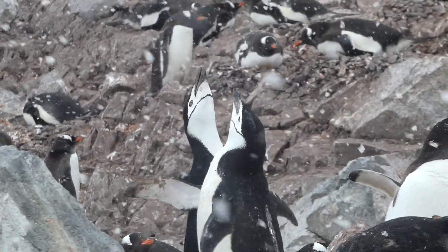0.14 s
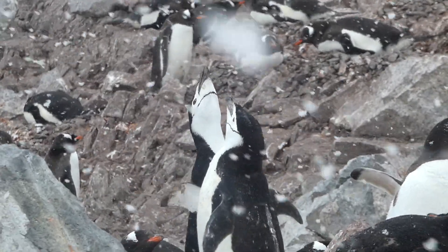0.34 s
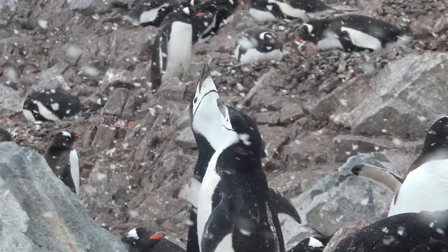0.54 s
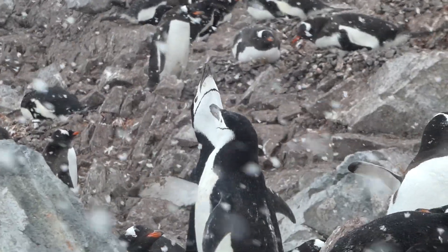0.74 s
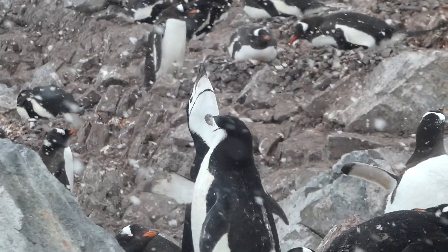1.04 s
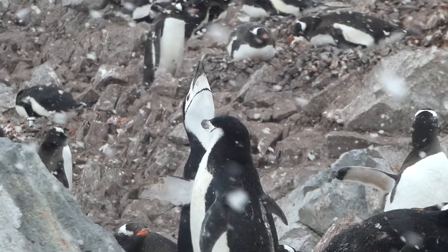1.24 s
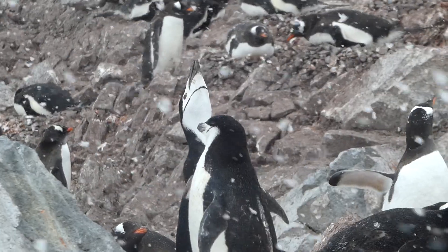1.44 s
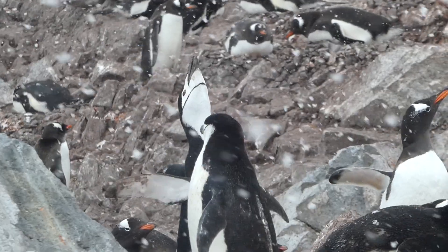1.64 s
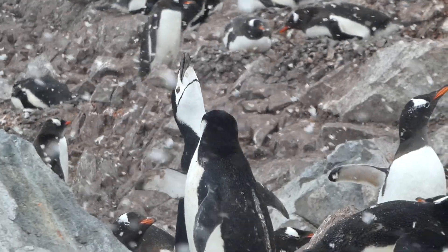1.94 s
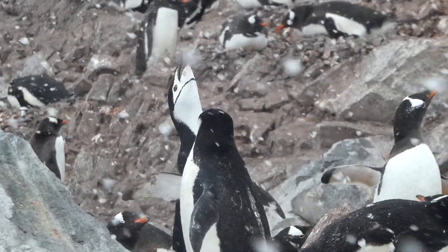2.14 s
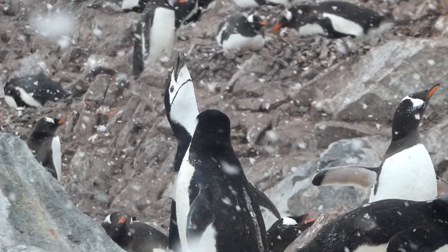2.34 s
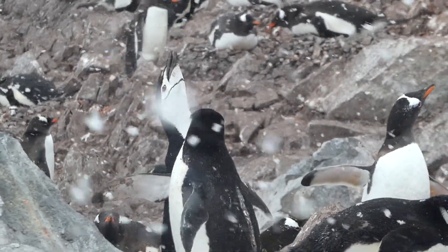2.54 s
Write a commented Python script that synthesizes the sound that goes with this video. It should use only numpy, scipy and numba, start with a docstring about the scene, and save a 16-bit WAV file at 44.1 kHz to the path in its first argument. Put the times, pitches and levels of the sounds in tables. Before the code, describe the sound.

Close raspy penguin braying, heaving and cracking into squeaks, with distant birds calling on rocky ground

```python
"""Penguin braying on a rocky slope

Close by, eight rasping swells rise and fall in pitch, some cracking into a squeak: harmonics and uneven
pulses excite moving throat resonances. A neighbour's clear note and the farther calls are harmonic tones.
Clicks, perhaps the bird's creak, are short gritty noise bursts; the colony and the wind puffs on the
microphone are banded noise. The rocks add decaying reflections, different at each ear.
"""
import sys
import numpy as np
from scipy import signal
from scipy.fft import rfft, irfft, next_fast_len
from scipy.io import wavfile
from scipy.ndimage import uniform_filter1d
from numba import njit

SR = 44100
rng = np.random.default_rng(int(sys.argv[2]) if len(sys.argv) > 2 else 0)


def int16_out(signal):
    """Quantize to a 16-bit WAV file."""
    q = np.round(np.clip(np.atleast_2d(signal).T, -1, 1) * 32767)
    wavfile.write(sys.argv[1], SR, q.astype(np.int16))


N = 119070
T = np.arange(N) / SR

# pulse rate of the bray: t/s, f/Hz
PITCH = [(.205, 300), (.24, 442.2), (.28, 526), (.32, 458.7), (.345, 427.3), (.38, 365.3), (.42, 353),
         (.49, 561.4), (.57, 495.8), (.6, 447.8), (.63, 403.5), (.655, 404.8), (.68, 445.2), (.71, 472.2),
         (.73, 506), (.745, 603), (.772, 488.8), (.805, 474), (.86, 400.4), (.9, 403.2), (.955, 495.9),
         (.975, 597), (1.01, 513.3), (1.035, 505), (1.06, 466.3), (1.12, 405), (1.15, 367.2),
         (1.185, 251.8), (1.457, 329.2), (1.48, 471.6), (1.515, 535), (1.538, 615.5), (1.553, 495),
         (1.61, 421.7), (1.68, 339.9), (1.715, 440.8), (1.755, 512.3), (1.815, 488), (1.85, 445.3),
         (1.93, 281.8), (1.985, 319.2), (2.01, 411.5), (2.072, 547.3), (2.095, 466.7), (2.12, 436),
         (2.22, 298), (2.28, 465), (2.34, 517.3), (2.375, 467.4), (2.4, 453), (2.43, 398), (2.48, 289.8)]
# hoarseness: t/s, roughness (0 to 1)
HOARSE = [(.26, .65), (.33, .2), (.6, .45), (.7, .15), (.82, .35), (.92, .15), (1.01, .3), (1.12, .2),
          (1.48, .7), (1.55, .2), (1.73, .6), (1.82, .25), (2.1, .5), (2.3, .6), (2.39, .25)]
# spectral envelope of the throat: f/Hz, level/dB
THROAT = [(260, -46), (450, -22), (554, 3.5), (745, -3.5), (930, 5.5), (1130, 2), (1200, 2.5), (1520, -3.5),
          (1860, 4), (2130, -2.5), (2400, -1.5), (2620, -9.5), (3740, -12.5), (5400, -12.5), (7960, -28),
          (10100, -23.5), (15500, -48)]
# the bird voices: start t/s, end t/s
PHRASES = [(0.207, 1.186), (1.46, 1.965), (1.986, 2.48)]
PHRASE_ATTACK_S, PHRASE_RELEASE_S = 0.0067, 0.007
REFERENCE_EFFORT_DB = -21.5
BREAK_BELOW_DB, ROUGHER_PER_DB = -21, .1
THROAT_HZ, THROAT_HZ_PER_DB, RISING_DROP_HZ = 1800, 11, 212
THROAT_FOLLOWS_PITCH = 0.73  # exponent
THROAT_WIDTH_HZ, THROAT_BYPASS = 180, 0.64
# a second resonance sits just above the first
SECOND_RATIO, SECOND_WIDTH_HZ, SECOND_DB = 1.207, 840, 0.5
BASS_DB, MIDDLE_DB, TREBLE_DB = -14.5, -1.5, -8.5  # at the reference effort
BASS_FOLLOWS, TREBLE_FOLLOWS = 0.57, 0.98  # share of the effort's swing in dB
RISING_BASS_DB, RISING_TREBLE_DB = 3.5, 1  # a rising swell is fuller
CRACK_LOSS = .7  # share of the amplitude lost during a squeak


def bray():
    """Source-filter principle: effort makes the voice louder and clearer and lifts the throat resonances."""
    level_db, (hz,), (hoarse,) = effort_db(), in_time(PITCH), in_time(HOARSE)
    effort = level_db - REFERENCE_EFFORT_DB
    falling = uniform_filter1d((np.gradient(hz) < 0) * 1., size=600)
    rising = 1 - falling
    rough = np.clip(hoarse + ROUGHER_PER_DB * np.maximum(BREAK_BELOW_DB - level_db, 0), 0, 1)
    source = coloured(syrinx(hz, rough, falling), THROAT)

    throat_hz = THROAT_HZ + THROAT_HZ_PER_DB * effort - RISING_DROP_HZ * rising
    throat_hz = throat_hz * (hz / 470) ** THROAT_FOLLOWS_PITCH
    first = resonance(source, throat_hz, THROAT_WIDTH_HZ)
    second = resonance(source, SECOND_RATIO * throat_hz, SECOND_WIDTH_HZ)
    throat = THROAT_BYPASS * source + first + from_db(SECOND_DB + .5 * effort) * second

    # each band is held at unit power, so its gain alone sets its level
    bass = evened(band(band(source, 1257, "low", order=6), 430, "high"))
    middle = evened(band(throat, [1150, 3200], "band", order=4))
    treble = evened(band(smeared(source), 2650, "high", order=6))
    bass = bass * from_db(BASS_DB + BASS_FOLLOWS * effort + RISING_BASS_DB * rising)
    middle = middle * from_db(MIDDLE_DB + effort)
    treble = treble * from_db(TREBLE_DB + TREBLE_FOLLOWS * effort + RISING_TREBLE_DB * (.5 + rising))

    sounding = 0
    for start, end in PHRASES:
        attack = np.clip((T - start) / PHRASE_ATTACK_S + .5, 0, 1)
        sounding = sounding + attack * np.exp(-np.maximum(T - end, 0) / PHRASE_RELEASE_S)
    cracked = np.clip(sum(gate(s, length, .006) for s, length, *_ in SQUEAKS), 0, 1)
    return sounding * (1 - CRACK_LOSS * cracked) * from_db(REFERENCE_EFFORT_DB) * (bass + middle + treble)


# rising swells: peak t/s, level/dB, rise/(dB/s)
RISES = [(0.272, -24.5, 290), (0.466, -32.5, 140), (.703, -18.5, 266), (.942, -18.5, 166),
         (1.503, -23.5, 296), (1.532, -30.5, 300), (1.735, -26, 427), (2.036, -20.5, 447),
         (2.302, -25, 350)]
# falling cries: start t/s, hold/s, level/dB, fade/(dB/s)
CRIES = [(0.297, 0.033, -22.5, 142), (0.541, 0.026, -18.5, 113), (0.76, 0.045, -17.5, 123),
         (0.997, 0.086, -18, 140), (1.552, 0.017, -17.5, 194), (1.808, 0.034, -17, 300),
         (2.096, 0.024, -21.5, 168), (2.374, 0.027, -20, 274)]
RISE_HOLD_S, RISE_END_DB_PER_S, CRY_ATTACK_DB_PER_S = 0.0092, 552, 1335


def effort_db():
    """Power summation of envelopes linear in dB: a swell builds and breaks off, a cry starts hard and fades."""
    levels = []
    for s, db, rate in RISES:
        before = np.maximum(s - RISE_HOLD_S - T, 0)
        after = np.maximum(T - s - RISE_HOLD_S, 0)
        levels.append(db - rate * before - RISE_END_DB_PER_S * after)
    for s, hold, db, rate in CRIES:
        before = np.maximum(s - T, 0)
        after = np.maximum(T - s - hold, 0)
        levels.append(db - CRY_ATTACK_DB_PER_S * before - rate * after)
    return 10 * np.log10(np.sum(from_db(np.maximum(levels, -70)) ** 2, axis=0))


JITTER_S, SHIMMER_DB = .00016, 4.5  # spread of pulse time and size
LIMP_S, LIMP_SHARE = .00008, .55  # every other pulse of a falling cry is later and weaker
RASP, RASP_FLOOR, WAVER = .9, .1, .004


def syrinx(hz, rough, falling):
    """Pulsed excitation: a clear tone breaks, as it grows hoarse, into limping pulses with rasp in each cycle."""
    cycles = np.cumsum(hz * (1 + WAVER * drift(60))) / SR
    at = np.flatnonzero(np.diff(np.floor(cycles)))
    late, strong = rng.standard_normal((N // 20, 2))[:len(at)].T
    limp = (np.arange(len(at)) % 2) * falling[at]
    to_cycle_end = (1 - cycles[at] % 1) * SR / hz[at]
    where = np.clip(at + SR * (JITTER_S * late + LIMP_S * limp) + to_cycle_end, 0, N - 2)
    size = from_db(SHIMMER_DB * strong) * (1 - LIMP_SHARE * limp)
    # share each pulse between the two nearest samples
    i, part = where.astype(int), where % 1
    pulses = np.bincount(i, size * (1 - part), N) + np.bincount(i + 1, size * part, N)
    rasp = band(rng.standard_normal(N), 1070, "high", order=1) * np.exp(-2.2 * (cycles % 1))
    clear = np.sqrt(1 - rough ** 2) * clear_voice(cycles, hz, falling)
    return clear + rough * evened(pulses) + (RASP_FLOOR + RASP * rough) * rms_one(rasp)


# balance of the harmonics, first upwards, as the pitch rises: level/dB
RISING_HARMONICS_DB = [6.5, 1.5, 8.5, 6.5, 3.5, 2.5, 1, -4.5, -14, -1.5, 0, -6.5, 0.5]
# the same as the pitch falls: level/dB
FALLING_HARMONICS_DB = [-7.5, 0, -2.5, 3, -1, -0.5, 1.5, -2.5, -5, -5.5, -2, -1.5, 3.5]
WANDER_DB, WANDER_RAD, WANDER_PER_S = 4, .8, 26  # spreads reached from the tenth harmonic up
CLEAR_TOP_HZ = 6000


def clear_voice(cycles, hz, falling, count=34):
    """Fourier synthesis: the harmonic balance follows the glide's direction and wanders, most in the treble."""
    out = 0
    for k in range(count):
        rise_db = RISING_HARMONICS_DB[k] if k < len(RISING_HARMONICS_DB) else 0
        fall_db = FALLING_HARMONICS_DB[k] if k < len(FALLING_HARMONICS_DB) else 0
        loose = min((k + 1) / 10, 1)
        db = rise_db + (fall_db - rise_db) * falling + loose * WANDER_DB * drift(WANDER_PER_S)
        phase = 2 * np.pi * (k + 1) * cycles + loose * WANDER_RAD * drift(WANDER_PER_S)
        out = out + from_db(db) * np.cos(phase)
    # harmonics spaced more widely are each stronger
    return band(out * np.sqrt(2 * hz / SR), CLEAR_TOP_HZ, "low")


SMEAR_SAMPLES, SMEAR = (11, 23), .45


def smeared(x):
    """Phase dispersion: short all-pass delays blur each pulse on its way through the windpipe."""
    for lag in SMEAR_SAMPLES:
        b = np.r_[-SMEAR, np.zeros(lag - 1), 1]
        x = signal.lfilter(b, b[::-1], x)
    return x


def resonance(x, centre_hz, width_hz):
    """Resonance: the bandwidth sets the decay, the centre may glide."""
    return moving_resonance(x, 2 * np.pi * centre_hz / SR, np.exp(-np.pi * width_hz / SR))


@njit
def moving_resonance(x, w, r):
    """Two-pole resonance of pole radius r, at an angle w that moves."""
    y = np.zeros(len(x))
    for i in range(2, len(x)):
        drive = (1 - r * r) / 2 * (x[i] - x[i - 2])
        y[i] = drive + 2 * r * np.cos(w[i]) * y[i - 1] - r * r * y[i - 2]
    return y


# the voice cracks: t/s, length/s, start f/Hz, end f/Hz, level/dB before the overtones' own
SQUEAKS = [(0.492, 0.011, 1560, 1562, -37), (0.526, 0.014, 1430, 1333, -23),
           (.747, 0.022, 1570, 1370, -27.5), (0.981, 0.022, 1590, 1402, -25),
           (1.79, 0.0052, 1440, 1367, -21), (2.359, 0.0095, 1420, 1312, -29)]
# harmonics of a squeak, first upwards: level/dB
SQUEAK_OVERTONES_DB = [0, -13, -22, -23, -36]


def squeaks():
    """Frequency modulation: short whistles glide unsteadily near the turn of a swell."""
    points, level = [], 0
    for s, length, start_hz, end_hz, db in SQUEAKS:
        points += [(s, start_hz), (s + length, end_hz)]
        level = level + from_db(db) * gate(s, length, 0.0019)
    hz, = in_time(points)
    return level * tone(hz * (1 + 0.0173 * drift(316)), SQUEAK_OVERTONES_DB)


# the neighbour's clear note: t/s, f/Hz, level/dB before the overtones' own
NOTE = [(0, 583, -53), (.045, 593, -49.5), (.095, 586.5, -49), (.115, 559, -58), (.15, 506, -87)]
# its harmonics, first upwards: level/dB
NOTE_OVERTONES_DB = [2.5, 9, -5.5, 0, -7.5, -2.5, -15, -10.5, -15, -17]


def neighbour():
    """Harmonic series on a gliding fundamental: a clear, slightly arched note."""
    hz, db = in_time(NOTE)
    return from_db(db) * tone(hz * (1 + 0.0073 * drift(140)), NOTE_OVERTONES_DB)


# clicks: t/s, level/dB before the halving below
CLICKS = [(1.221, -36.5), (1.255, -35), (1.283, -36.5), (1.347, -36), (1.392, -35)]
CLICK_DECAY_S = 0.0093


def clicks():
    """Exponential decay: sudden bursts of band-limited noise die away as short gritty clicks."""
    level = sum(from_db(db) * (T > s) * np.exp(-np.abs(T - s) / CLICK_DECAY_S) for s, db in CLICKS)
    grit = band(band(rng.standard_normal(N), [600, 4500], "band", order=1), 2920, "low")
    return .5 * level * rms_one(grit)


# calls farther off: t/s, length/s, start f/Hz, end f/Hz, level/dB before the overtones' own
FAR_CALLS = [(1.253, 0.11, 294.2, 312, -50.5), (1.445, 0.083, 309.9, 309, -52),
             (1.632, 0.042, 327, 314, -43), (2.075, 0.228, 292.1, 280.4, -50.5),
             (2.398, 0.11, 299, 306, -48)]
# harmonics of the distant voices, first upwards: level/dB
FAR_OVERTONES_DB = [-5, 2, -8, -7, -17, -5.5, -14]
FAR_WAVER = .04


def far_calls():
    """Amplitude and frequency modulation: the calls of other birds throb and waver."""
    out = 0
    for s, length, start_hz, end_hz, db in FAR_CALLS:
        level = from_db(db + 5.0 * drift(44)) * gate(s, length, 0.017)
        hz = np.interp(T, [s, s + length], [start_hz, end_hz]) * (1 + FAR_WAVER * drift(50.0))
        out = out + level * tone(hz, FAR_OVERTONES_DB)
    return out


CHORUS_DB = -64  # each voice, before the overtones' own levels


def chorus():
    """Superposition: three distant voices overlap, waver and throb independently."""
    out = 0
    for hz in (254, 292.5, 320):
        level = from_db(CHORUS_DB + 4 * drift(25))
        out = out + level * tone(hz * (1 + .07 * drift(4)), FAR_OVERTONES_DB)
    return out


# wind puffs: centre t/s, level/dB
PUFFS = [(0.293, -36), (1.599, -45), (1.828, -42), (1.954, -40.5)]
# spectrum of a puff: f/Hz, relative level/dB
PUFF_COLOUR = [(30, -11), (80, 0.5), (140, 6.5), (220, -7), (500, -45)]
PUFF_WIDTH_S = .026


def wind():
    """Turbulent pressure as low-frequency noise: soft Gaussian puffs on the microphone."""
    level = sum(from_db(db) * np.exp(-((T - s) / PUFF_WIDTH_S) ** 2) for s, db in PUFFS)
    return level * banded_noise(PUFF_COLOUR, patchy_db=4.5)


# spectrum of the colony: f/Hz, relative level/dB
COLONY = [(30, -19), (70, -11), (150, -4), (281, -5.5), (420, -5.5), (597, -11), (815, -13), (1000, -7),
          (1270, -21.5), (1730, -14), (3230, -21.5), (7060, -30), (15000, -38.5)]
COLONY_DB, COLONY_PATCHY_DB = -48.5, 1.8


def colony():
    """Diffuse field: steady coloured noise all round, flickering band by band."""
    return from_db(COLONY_DB) * banded_noise(COLONY, COLONY_PATCHY_DB)


# likeness of left and right: f/Hz, correlation (-1 to 1)
LIKENESS = [(150, -0.53), (300, 0.1), (600, 0.09)]


def banded_noise(spectrum, patchy_db):
    """Interaural correlation: half-octave bands of stereo noise, each with its own flicker and likeness."""
    out, edges = 0, 30 * 2 ** np.arange(0, 9.1, .5)
    white = rng.standard_normal((2, 2, N))
    for k, (low, high) in enumerate(zip(edges, edges[1:])):
        mid, side = band(white[k % 2], [low, high], "band")  # adjacent bands stay independent
        hz = np.sqrt(low * high)
        alike = np.clip(at_hz(LIKENESS, hz), -1, 1)
        stereo = np.sqrt(1 + alike) * mid + np.sqrt(1 - alike) * side * [[1], [-1]]
        out = out + from_db(at_hz(spectrum, hz) + patchy_db * drift(9.7)) * stereo
    return rms_one(out)


def scatter(x, t60):
    """Exponential reverberant decay: reflections off the rocks, different at each ear."""
    t = T[:SR // 2]
    tail = rng.standard_normal((2, len(t))) * from_db(-60 * t / t60) * (t > .001)
    tail = tail / np.sqrt(np.sum(tail ** 2, axis=1, keepdims=True))
    return signal.fftconvolve(x[None], tail, axes=1)[:, :N]


def from_db(db):
    """Logarithmic level: decibels to amplitude gain."""
    return 10 ** (np.asarray(db) / 20)


def rms_one(x):
    """Mean-square normalisation: scale to unit power."""
    return x / np.sqrt(np.mean(x ** 2) + 1e-20)


def evened(x, size=400):
    """Envelope normalisation: hold the short-term power near 1."""
    power = uniform_filter1d(uniform_filter1d(x * x, size), size)
    return x / np.sqrt(np.abs(power) + 1e-12)


def in_time(rows):
    """Linear interpolation: each column of a curve at every sample."""
    s, *columns = np.transpose(rows)
    return [np.interp(T, s, c) for c in columns]


def at_hz(points, hz):
    """Logarithmic frequency scale: read a spectrum between its points."""
    points_hz, db = np.array(points).T
    return np.interp(np.log(hz + 1e-3), np.log(points_hz), db)


def band(x, hz, kind, order=2):
    """Butterworth response: a maximally flat passband."""
    return signal.sosfilt(signal.butter(order, hz, kind, fs=SR, output="sos"), x)


def drift(rate):
    """Low-passed noise: slow chance of unit power, with two poles at the given rate in Hz."""
    r = np.exp(-80 * np.pi * rate / SR)  # one step every 40 samples
    slow = signal.lfilter([1], [1, -2 * r, r * r], rng.standard_normal(N // 40 + 2002))[2000:]
    return np.interp(np.arange(N) / 40, np.arange(len(slow)), rms_one(slow))


def coloured(x, spectrum):
    """Minimum phase: folding the cepstrum gives a causal filter with the given spectrum."""
    size = 2 * next_fast_len(N)
    cepstrum = irfft(np.log(from_db(at_hz(spectrum, np.fft.rfftfreq(size, 1 / SR)))))
    cepstrum[1:size // 2] *= 2
    cepstrum[size // 2 + 1:] = 0
    return irfft(rfft(x, size) * np.exp(rfft(cepstrum)))[..., :N]


def gate(start, length, edge):
    """Trapezoidal envelope: linear attack, hold and release, with half amplitude at start and end."""
    return np.clip(np.minimum(T - start, start + length - T) / edge + .5, 0, 1)


def tone(hz, overtones_db):
    """Harmonic series: integer multiples of a moving fundamental, each at its own rms level."""
    phase = 2 * np.pi * np.cumsum(hz) / SR
    return np.sqrt(2) * sum(from_db(db) * np.sin((k + 1) * phase) for k, db in enumerate(overtones_db))


PAN_DB, SPREAD_DB, ECHO_DB, ECHO_T60_S = .9, -6.5, -22, .24


def scene():
    """Level-difference panning: voices and clicks lean right, near treble scatters wide, the colony surrounds."""
    near = bray() + squeaks() + neighbour() + clicks()
    far = far_calls() + chorus() + chorus()
    body = band(near + far, 3800, "low", order=1)
    direct = near + far + body * (from_db([[-PAN_DB], [PAN_DB]]) - 1)  # only the body is panned
    wide = from_db(SPREAD_DB) * scatter(band(near, 8000, "high", order=1), .02)
    echoes = from_db(ECHO_DB) * scatter(near + from_db(1) * far, ECHO_T60_S)
    return direct + wide + echoes + wind() + colony()


CUTOFF_HZ = 15400


def record(dry):
    """Band limiting: a steep elliptic low-pass cuts the top."""
    return signal.sosfilt(signal.ellip(10, .1, 80, CUTOFF_HZ, fs=SR, output="sos"), dry)


dry = scene()
out = record(dry)
int16_out(out)
```